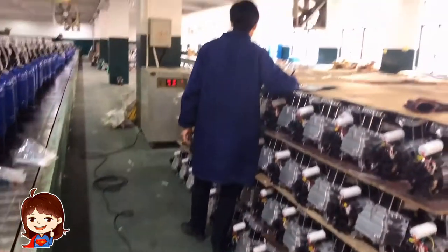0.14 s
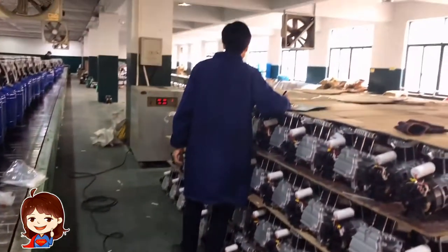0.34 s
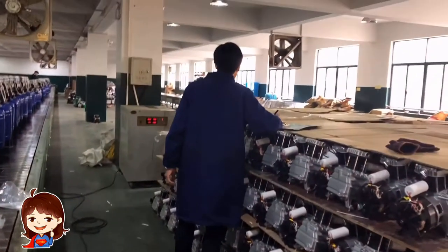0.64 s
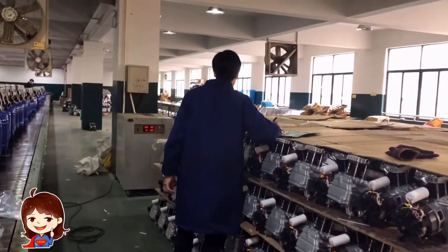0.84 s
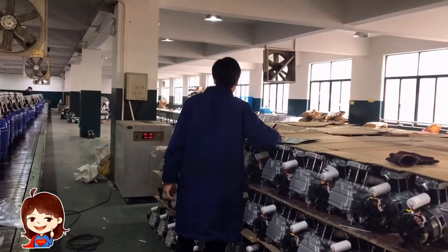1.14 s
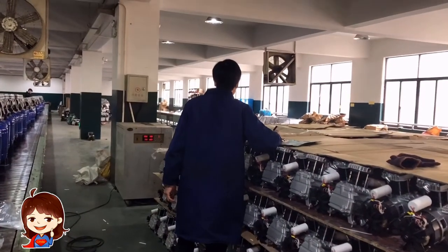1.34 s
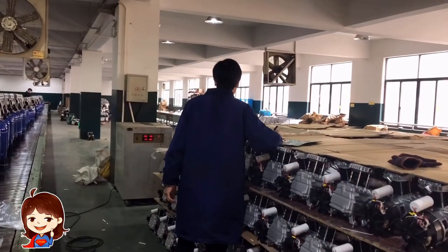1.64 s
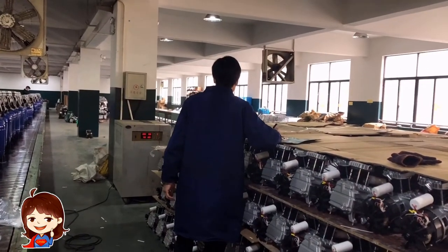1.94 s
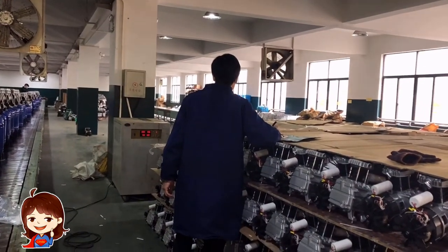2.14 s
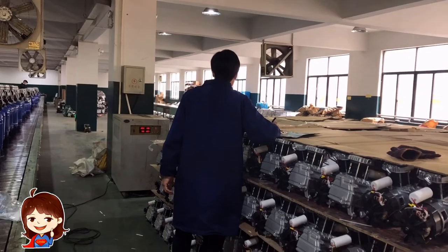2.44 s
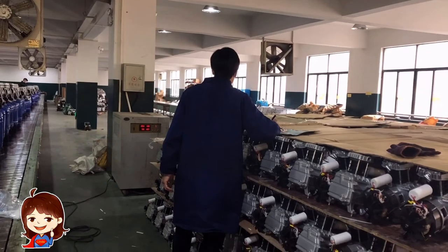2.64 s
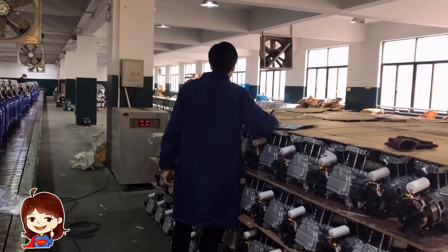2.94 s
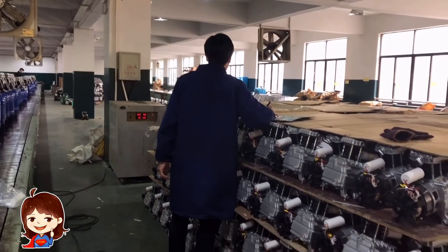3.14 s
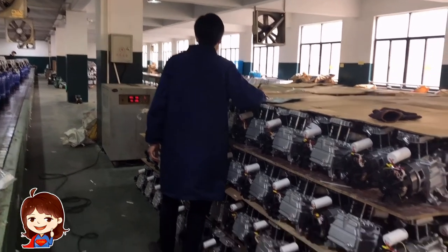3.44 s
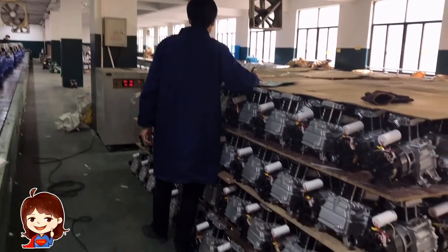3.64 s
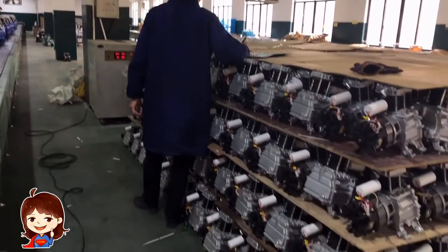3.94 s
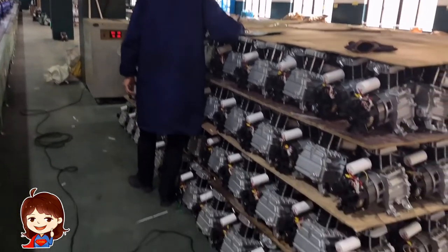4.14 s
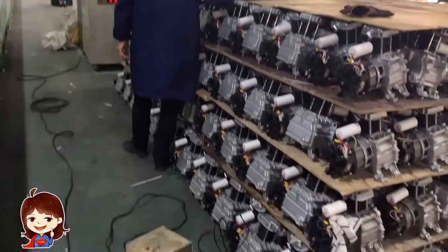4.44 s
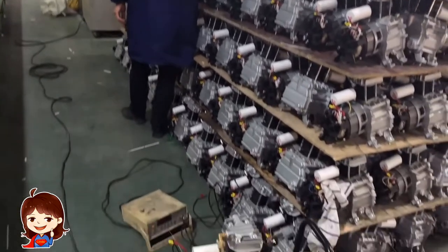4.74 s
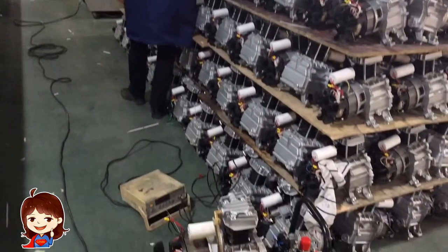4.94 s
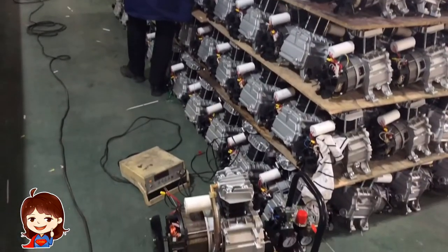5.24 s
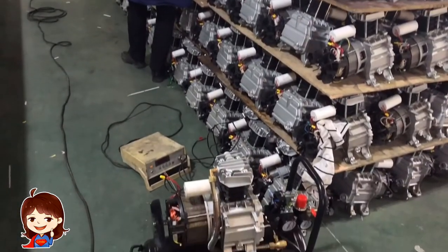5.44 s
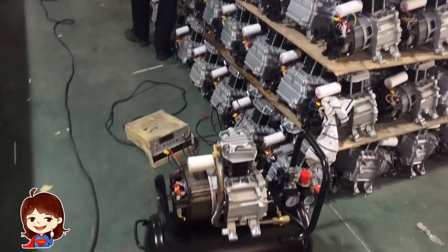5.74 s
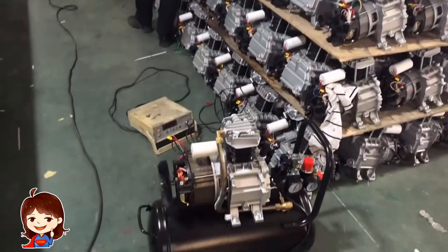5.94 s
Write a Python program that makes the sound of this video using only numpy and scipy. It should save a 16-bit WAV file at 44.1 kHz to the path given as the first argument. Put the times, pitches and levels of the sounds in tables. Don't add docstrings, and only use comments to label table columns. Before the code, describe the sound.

A continuous mid-range compressor drone already fills the hall at the start, its tone colouring shifting slightly with the moving microphone. Fast valve clacks blur into a ringing rattle over broad air hiss. Short, high, loose-plate squeaks flicker on top, ending near five seconds. From the middle onward the pump is faced directly, sounding brighter and closer, and keeps running at nearly constant speed to the end.

```python
import sys
import numpy as np
from scipy import signal
from scipy.io import wavfile
from scipy.ndimage import uniform_filter1d

SR = 44100
rng = np.random.default_rng(int(sys.argv[2]) if len(sys.argv) > 2 else 0)


def waveform_to_disk(signal):
    frames = np.transpose(np.atleast_2d(signal))
    scaled = np.clip(frames, -1, 1) * 32767
    samples = np.round(scaled).astype(np.int16)
    wavfile.write(sys.argv[1], SR, samples)


def to_linear_factor(level_db):
    exponent = np.asarray(level_db, float) / 20
    return 10 ** exponent


N = 267951
T = np.arange(N) / SR

# (time [s], speed [turns/s])
SHAFT_SPEED = [(0.0, 43.59), (6.08, 43.272)]
# (time [s], aim [0 turned away - 1 facing the pump])
MIC_AIM = [(0, 0.014), (3, 0), (3.5, 0.34), (4, 0.79), (4.5, 1), (6.08, 0.98)]
# (time [s], openness [0 hidden - 1 open])
HEAD_VIEW = [(0, 0), (3.3, 0), (3.7, .2), (4.55, .35), (4.75, .7), (5.4, 1), (6.08, 1)]
# (multiple [1], away [dB rms], facing [dB rms])
BODY_ORDERS = [(1, -49.5, -45.5), (2, -36.5, -34), (3, -79, -47.5), (4, -41, -40), (5, -41.5, -39.5),
               (6, -24, -23.5), (7, -29, -27), (8, -29, -26.5), (9, -34, -34), (10, -29.5, -27),
               (11, -40.5, -36.5), (12, -31, -36), (13, -43.5, -34), (14, -39, -35.5), (15, -26.5, -23.5),
               (16, -29, -23.5), (17, -32, -36), (18, -26, -24.5), (19, -24, -20.5), (20, -35.5, -29.5),
               (21, -33, -30.5)]
# (multiple [1], away [dB rms], facing [dB rms])
UPPER_ORDERS = [(22, -49, -44), (23, -40, -41), (24, -38, -45.5), (25, -42.5, -31.5), (26, -32.5, -48),
                (27, -46.5, -45.5), (28, -35, -45), (29, -38.5, -33), (30, -38, -35.5), (31, -49, -39),
                (32, -40, -35), (33, -42, -40), (34, -54, -36), (35, -43, -47), (36, -38.5, -29),
                (37, -44, -43), (38, -45, -50), (39, -62, -49), (40, -55, -47), (41, -47.5, -56),
                (43, -56, -53), (44, -44, -46)]
# (crank angle [turns], frequency [Hz], width [Hz], signed strength [1])
PRESSURE_PUFFS = [(.077, 350, 200, -1.), (.64, 300, 150, .6), (.83, 300, 150, .6), (.625, 190, 40, 2.),
                  (.838, 262, 18, 1.5), (.132, 565, 45, 1.5), (.952, 780, 200, 1.), (.686, 820, 55, 1.3),
                  (.497, 650, 55, -.9), (.985, 1085, 60, 2.), (.9, 1260, 60, 2.), (.33, 1410, 40, 2.),
                  (.104, 1540, 50, 2.), (.895, 1350, 500, .4)]
# (frequency [Hz], width [Hz], slip [rad], stroke centre [turns], stroke length [turns])
REED_SLIP = (812, 66, .7, .45, .27)
# (frequency [Hz], width [Hz], lag [rad])
FLOOR_ECHO = (365, 45, .8)
# (time [s], frequency [Hz], level [dB])
HALL_SPOTS = [(.1, 175, -6), (.1, 218, -11), (.2, 261, -2.5), (0.11, 653, -3.5), (0.22, 697, -2.5),
              (0.23, 740, -7), (0.08, 827, 3), (.1, 871, 4), (0.36, 1132, -5.5), (.3, 1219, -11),
              (.1, 1567, 2.5), (2.26, 1522, 12.5), (2.4, 1200, -15), (2.7, 1216, 8), (3.1, 651, -2),
              (2.3, 1500, 6.5), (3.2, 304, -7.5), (3.2, 781, 1.5), (3.3, 911, 5.5), (4.2, 347, 2.5),
              (4, 434, 2), (4.75, 520, -16), (4.06, 1084, -7), (4.2, 954, 9), (3.5, 1258, 5),
              (.2, 1045, -17), (3.8, 1128, -8), (3.2, 1171, 7), (1.5, 1088, 2), (3.4, 1301, -6)]
# (time [s], level [dB])
INTAKE_LEVEL = [(0.0, -33), (6.08, -32)]
# (frequency [Hz], width [Hz], level [dB], open-stroke centre [turns], depth [dB])
INTAKE_TONES = [(812, 63, -2, 0.25, -10), (1414, 100, -1.5, .02, 1.5), (699, 144, -4, 0.41, -9),
                (926, 90, -7, 0.67, -1)]
HEAD_MODE_HZ = [2160, 3180, 3590, 4090, 5335, 6005, 6720, 6870, 7900, 9030, 9545, 9560, 10600, 14150, 2300,
                2555]
# (width [Hz], crank angle [turns], hidden [dB], in view [dB], steady share [0-1])
HEAD_RINGING = [(57, .93, -42.5, -39, 0.87), (90, .93, -43.5, -40.5, 0.63), (91, 0.93, -36.5, -30.5, 0.68),
                (220, 0.99, -35.5, -34, 0.52), (110, .91, -33.5, -36.5, 0.2), (79.4, .89, -36, -35, 0.54),
                (120, 0.74, -36, -36, 0.5), (120, .88, -33, -37, 0.19), (45.5, 0.98, -40, -32, 0.4),
                (260, 0.75, -43.5, -32, 0.04), (150, .66, -39, -52, 0.5), (220, 0.97, -48, -42, 0.25),
                (150, 0.81, -49, -40, 0.07), (360, 0.69, -39, -41, 0.4), (50, 0.75, -48, -36.5, 0.2),
                (60, 0.78, -44.5, -44, 0.74)]
HEAD_RATTLE_MS = [3, 3, 4, 2, 1.2, 4.5, 3.5, 2.2, 5, 1.3, 2.5, 2.5, 2.5, 4, 3, 3]
# (frequency [Hz], width [Hz], level [dB])
PLATE_MODES = [
    (12220, 260, 0),
    (11500, 300, -5),
    (8300, 1600, -5),
]
# (start [s], length [s], level [dB])
SQUEAK_SPELLS = [(.01, .03, -27), (.40, .09, -28), (.60, .14, -27), (.81, .07, -25), (1.18, .04, -21.5),
                 (1.32, .06, -25), (1.43, .02, -26), (1.62, .02, -26), (1.71, .02, -24), (1.80, .07, -22),
                 (1.89, .07, -24), (2.01, .06, -21), (2.12, .02, -31), (2.28, .07, -23), (2.37, .07, -24),
                 (2.49, .04, -27), (2.58, .04, -24), (2.65, .04, -23), (2.72, .04, -21), (2.90, .07, -22),
                 (3.13, .07, -23.5), (3.25, .09, -24), (3.36, .14, -25.5), (3.82, .02, -20),
                 (3.94, .04, -24), (4.12, .02, -27), (4.22, .02, -20), (4.56, .07, -26), (4.79, .07, -24),
                 (4.95, .09, -25)]
# (frequency [Hz], density [dB per Hz])
AIR_SPECTRUM = [(22, -87), (45, -65), (250, -63.5), (500, -63.5), (1000, -61), (1600, -62.5), (2000, -64.5),
                (2800, -65), (3800, -62.5), (7000, -64.5), (9500, -66), (13000, -70), (15000, -70.5),
                (15700, -65.5)]
# (time [s], level [dB])
AIR_TRIM = [(0.0, -1), (6.08, 1.5)]
# (time [s], frequency [Hz], level [dB])
MOTOR_COAST = [(3.38, 325, -60), (3.46, 278, -42), (3.6, 263, -37), (3.8, 237, -40), (4.05, 220, -58)]

FIRST_TURN = .049
SPOT_S, SPOT_HZ = 0.53, 20
SEATED_DB = -39
EDGE_HZ = 15750
KNEE = .6


def evened(x):
    return x / np.sqrt(np.mean(x ** 2) + 1e-20)


def curve(rows, col=1):
    rows = np.array(rows, float)
    return np.interp(T, rows[:, 0], rows[:, col])


def resonate(x, hz, width_hz):
    r = np.exp(-np.pi * width_hz / SR)
    return signal.lfilter([1, 0, -r], [1, -2 * r * np.cos(2 * np.pi * hz / SR), r * r], x)


def drift(rate_hz, count):
    knots = rng.standard_normal((count, 200))
    return np.array([np.interp(T * rate_hz, np.arange(len(k)), k) for k in knots])


def burst(turns, angle, strength_db, decay_s, knock=0):
    since = turns - angle + 1
    fade = np.exp(-(since % 1) / curve(SHAFT_SPEED) / decay_s)
    first = np.diff(np.floor(since), prepend=np.floor(since[0]))
    strength = to_linear_factor(strength_db[since.astype(int)])
    return strength * (fade * rng.standard_normal(N) + knock * first)


def reed_slide(turns):
    _, _, slip_rad, centre, length = REED_SLIP
    since = turns - 1 / 6
    slip = slip_rad * np.exp(-((since % 1 - centre) / length) ** 2 / 2)
    draws = np.clip(rng.standard_normal(300), -1.8, 1.8)
    return np.exp(1j * slip * draws[(since + 1).astype(int)] + slip ** 2 / 2)


def hall_gain_db(order_hz):
    return sum(db * np.exp(-((T - s) / SPOT_S) ** 2 / 2) * np.exp(-((order_hz - hz) / SPOT_HZ) ** 2)
               for s, hz, db in HALL_SPOTS if abs(order_hz - hz) < 2 * SPOT_HZ)


def hum(turns, aim, wander_db=.5, wander_rad=0.12):
    reed_hz, reed_width_hz = REED_SLIP[:2]
    echo_hz, echo_width_hz, echo_rad = FLOOR_ECHO
    slide = reed_slide(turns)
    orders = list(BODY_ORDERS) + list(UPPER_ORDERS)
    out, shake = np.zeros(N), drift(9., count=2 * len(orders))
    for i, (k, away_db, facing_db) in enumerate(orders):
        k = round(k)
        order_hz = k * SHAFT_SPEED[0][1]
        puff = sum(s * np.exp(-((order_hz - hz) / w) ** 2 / 2 - 2j * np.pi * k * a)
                   for a, hz, w, s in PRESSURE_PUFFS)
        db = away_db + (facing_db - away_db) * aim + hall_gain_db(order_hz) + wander_db * shake[2 * i]
        lag = echo_rad * np.exp(-((order_hz - echo_hz) / echo_width_hz) ** 2) * aim
        phase = 2 * np.pi * k * turns + np.angle(puff) - lag + wander_rad * shake[2 * i + 1]
        sung = np.exp(-((order_hz - reed_hz) / reed_width_hz) ** 4)
        out += to_linear_factor(db) * np.sqrt(2) * (np.exp(1j * phase) * (1 - sung + sung * slide)).real
    return out


def flutter(turns):
    out = np.zeros(N)
    for hz, width_hz, db, centre, depth_db in INTAKE_TONES:
        tone = resonate(rng.standard_normal(N), hz, width_hz)
        tone = evened(resonate(tone, hz, 1.76 * width_hz))
        stroke_db = depth_db / 2 * np.cos(2 * np.pi * (turns - centre))
        out += to_linear_factor(db + stroke_db) * tone
    return to_linear_factor(curve(INTAKE_LEVEL)) * out


def clack(turns, view, shared_db=1.4, own_db=1.0, knock=16., skirt=4.):
    out, blows = np.zeros(N), rng.standard_normal((300, len(HEAD_RINGING) + 1))
    modes = zip(HEAD_RINGING, HEAD_MODE_HZ, HEAD_RATTLE_MS)
    for i, ((width_hz, angle, hidden_db, open_db, steady), hz, rattle_ms) in enumerate(modes):
        steady = np.clip(steady, 0, 1)
        blow_db = shared_db * blows[:, -1] + own_db * blows[:, i]
        slam = evened(burst(turns, angle, blow_db, rattle_ms / 1000, knock))
        drive = np.sqrt(1 - steady) * slam + np.sqrt(steady) * rng.standard_normal(N)
        ring = resonate(resonate(drive, hz, width_hz), hz, skirt * width_hz)
        out += to_linear_factor(hidden_db + (open_db - hidden_db) * view) * evened(ring)
    return out


def squeak(turns, angle=.82, spread_db=1.2, decay_s=.0013, trim_db=-6, knock=7.):
    drive = burst(turns, angle, spread_db * rng.standard_normal(300), decay_s, knock)
    ring = evened(sum(to_linear_factor(db) * evened(resonate(resonate(drive, hz, w), hz, 2 * w))
                      for hz, w, db in PLATE_MODES))
    struck_s = np.interp(np.floor(turns - angle) + angle, turns, T)
    level_db = np.full(N, float(SEATED_DB))
    for start_s, length_s, db in SQUEAK_SPELLS:
        level_db = np.where((struck_s >= start_s) & (struck_s < start_s + length_s), db, level_db)
    return to_linear_factor(level_db + trim_db) * ring


def hiss(turns, puff=0.98, decay_s=0.01, spread_db=2.1, patchy_db=1.13, corner_hz=2500):
    air = rng.standard_normal(N)
    discharge = evened(burst(turns, .88, spread_db * rng.standard_normal(300), decay_s))
    hz, _, low = signal.stft(air, SR, nperseg=1024)
    high = signal.stft(evened(air + puff * discharge), SR, nperseg=1024)[2]
    share = (1 / (1 + (corner_hz / (hz + 1)) ** 4))[:, None]
    patches = rng.standard_normal(low.T.shape).T
    patches = evened(uniform_filter1d(uniform_filter1d(patches, 10, 0), 10, 1))
    table_hz, table_db = np.transpose(AIR_SPECTRUM)
    density_db = np.interp(np.log(hz + 1), np.log(table_hz), table_db)[:, None]
    colour = to_linear_factor(density_db + patchy_db * patches) * np.sqrt(SR / 2)
    spectrum = ((1 - share) * low + share * high) * colour
    return to_linear_factor(curve(AIR_TRIM)) * signal.istft(spectrum, SR, nperseg=1024)[1][:N]


def coast():
    on = (T > MOTOR_COAST[0][0]) & (T < MOTOR_COAST[-1][0])
    phase = 2 * np.pi * np.cumsum(curve(MOTOR_COAST)) / SR
    return on * to_linear_factor(curve(MOTOR_COAST, col=2)) * np.sqrt(2) * np.sin(phase)


def scene():
    turns = FIRST_TURN + np.cumsum(curve(SHAFT_SPEED)) / SR
    pump = hum(turns, np.clip(curve(MIC_AIM), 0, 1)) + flutter(turns)
    pump = pump + clack(turns, curve(HEAD_VIEW)) + squeak(turns)
    return (pump + hiss(turns) + coast())[None]


def band_limit(x):
    return signal.sosfilt(signal.butter(12, 16850, fs=SR, output="sos"), x)


def record(dry):
    thinned = signal.sosfilt(signal.butter(4, 36, "high", fs=SR, output="sos"), dry)
    over = np.maximum(abs(thinned) - KNEE, 0)
    softened = thinned - np.sign(thinned) * (over - (1 - KNEE) * np.tanh(over / (1 - KNEE)))
    edge = signal.firwin(1501, EDGE_HZ, window=("kaiser", 11), fs=SR)
    mix = signal.oaconvolve(softened, edge[None], "same")
    return band_limit(mix)


dry = scene()
out = record(dry)
waveform_to_disk(out)
```